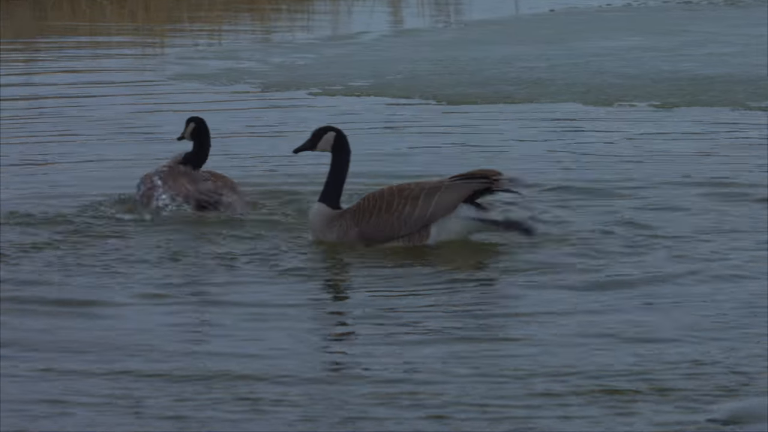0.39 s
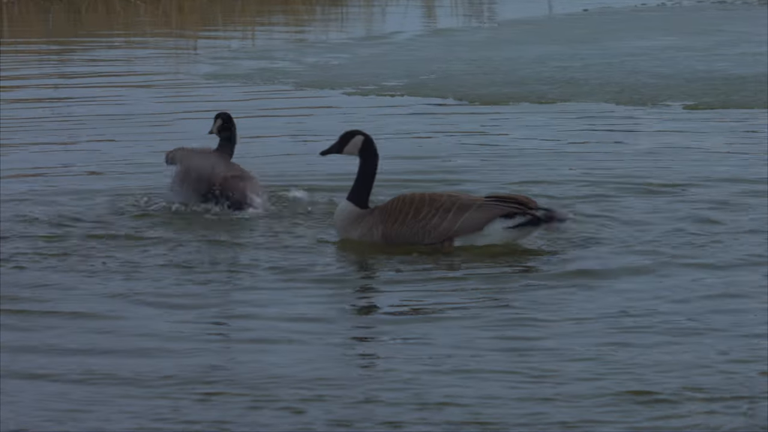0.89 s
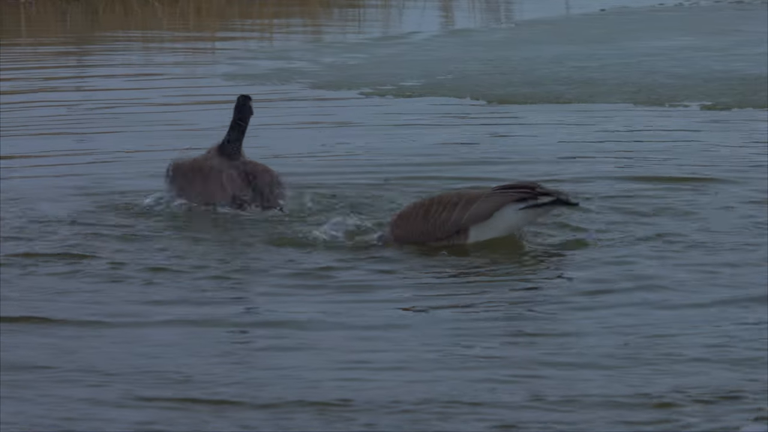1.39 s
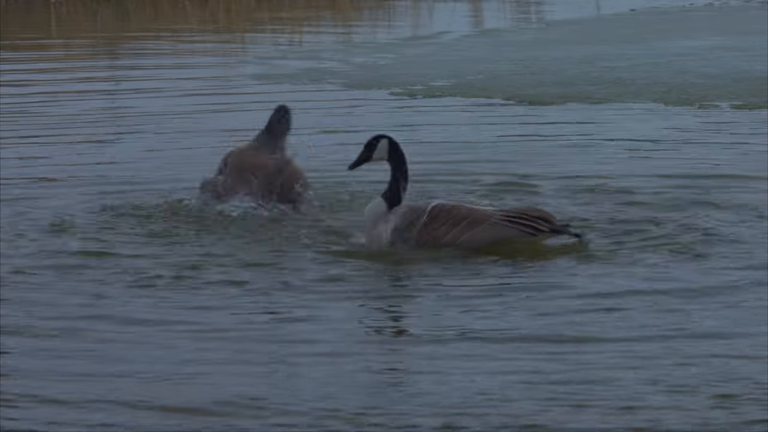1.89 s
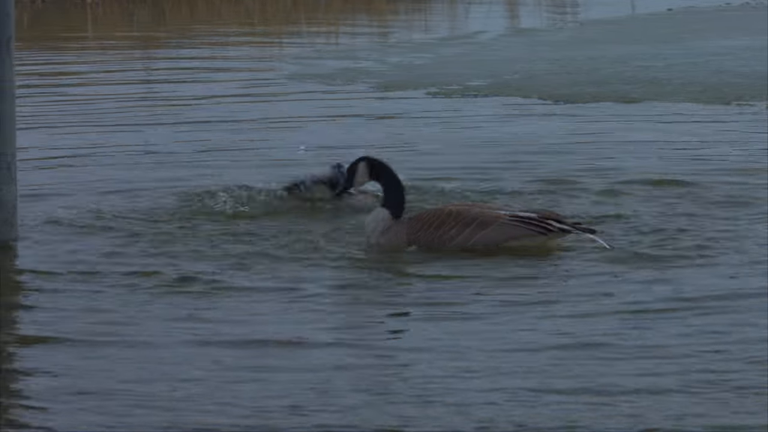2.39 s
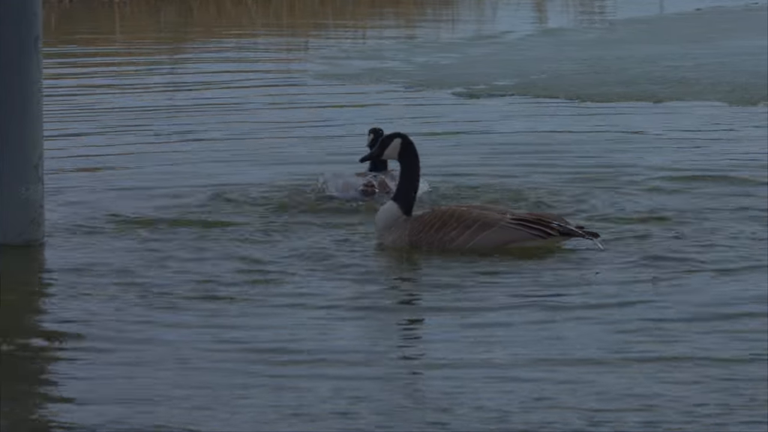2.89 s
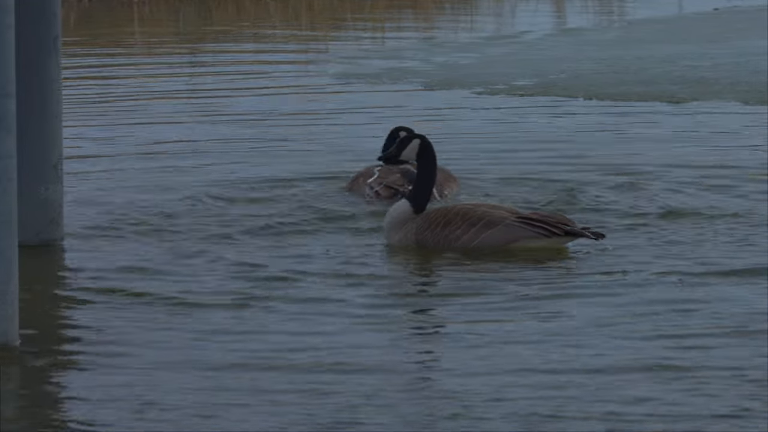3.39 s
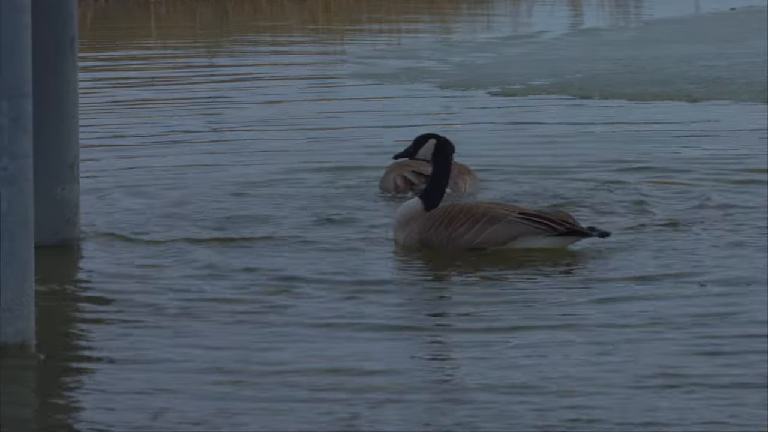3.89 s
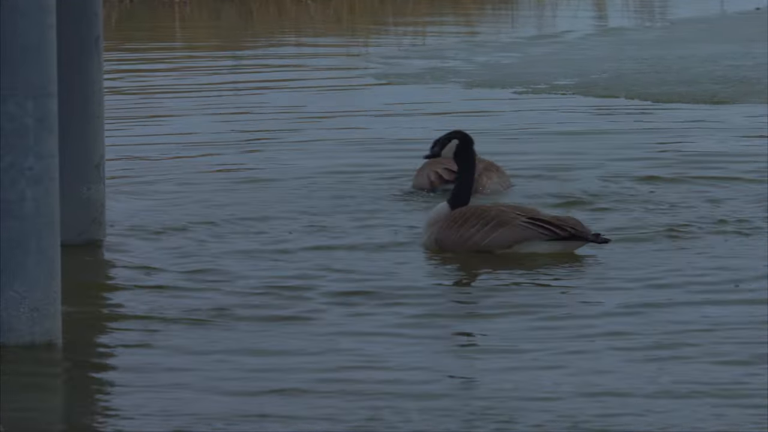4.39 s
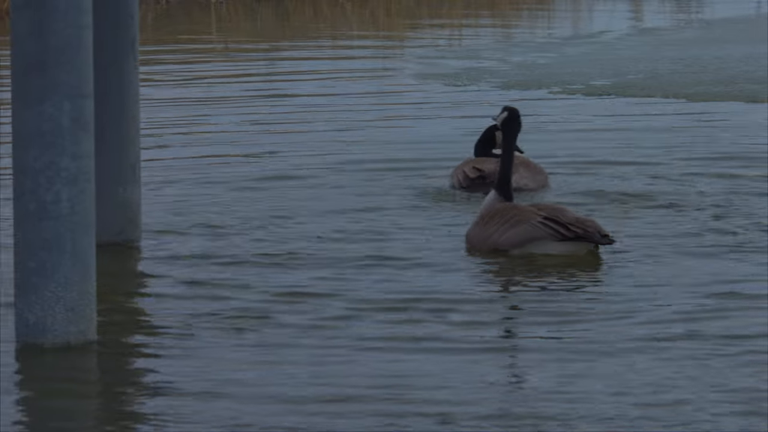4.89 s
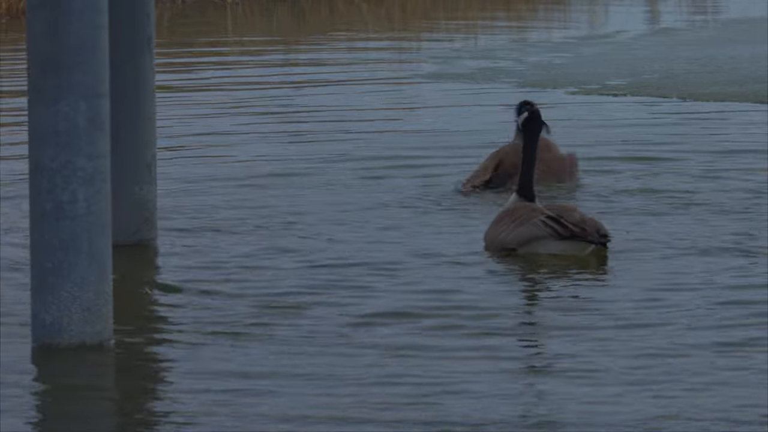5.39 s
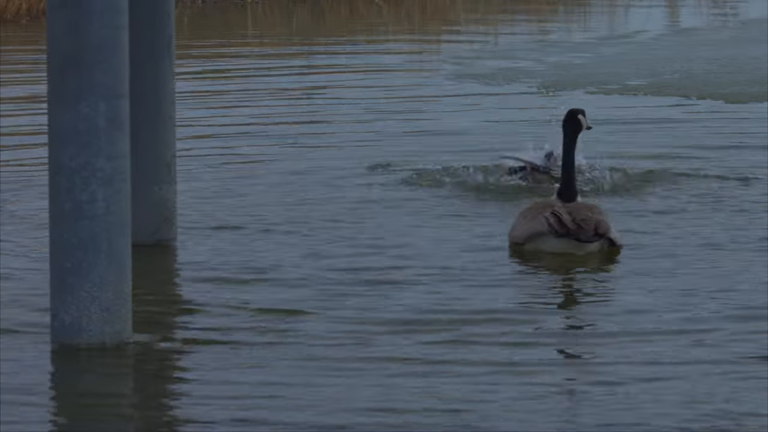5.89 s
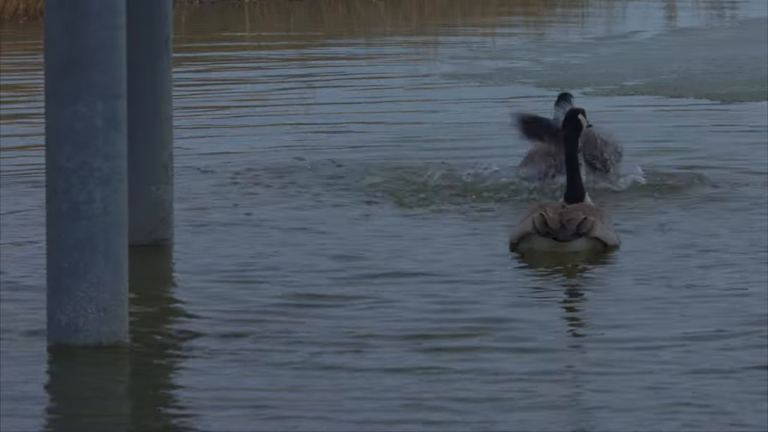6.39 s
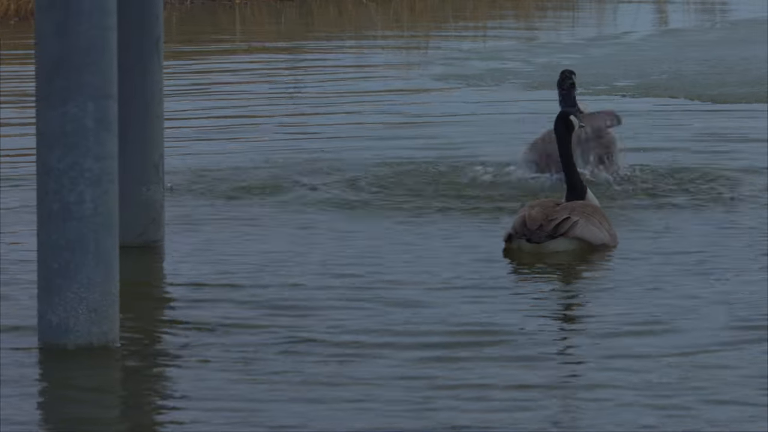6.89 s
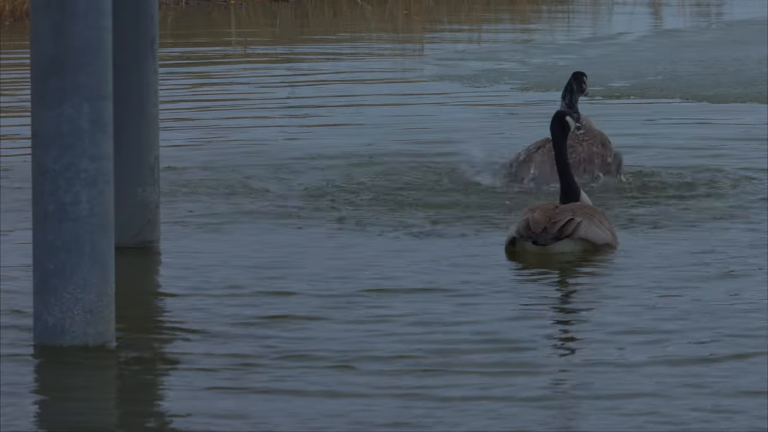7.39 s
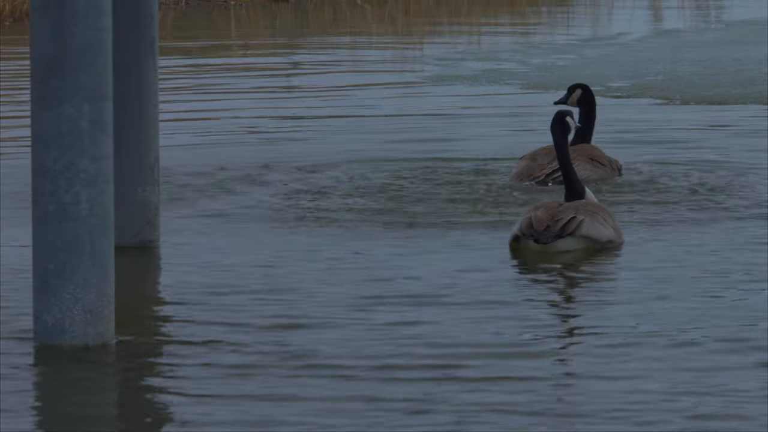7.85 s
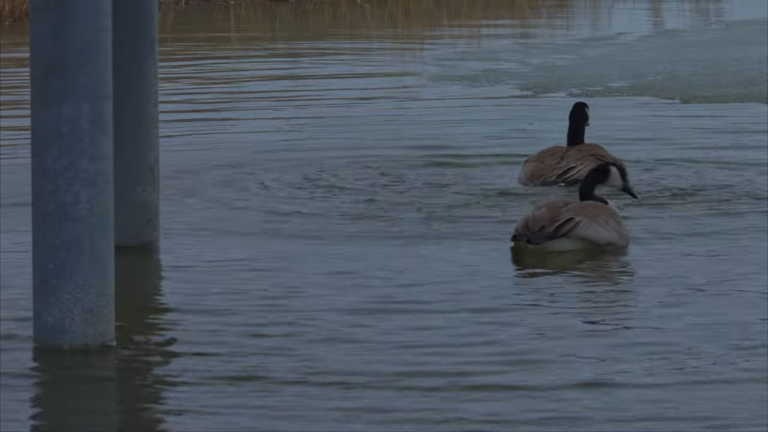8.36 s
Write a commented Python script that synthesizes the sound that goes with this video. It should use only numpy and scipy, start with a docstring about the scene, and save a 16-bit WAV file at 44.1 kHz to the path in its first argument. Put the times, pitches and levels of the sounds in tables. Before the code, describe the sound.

Several geese honk in short overlapping calls on a pond while wings splash the water, over buffeting wind rumble and a far traffic roar.

```python
"""A flock of geese honks across a pond: harmonic stacks on arched pitches, with a rough break at some calls.
Two of them bathe, beating wings on the water: bursts of hiss with bubble grains, and ringing drops.
Wind buffets the microphone as gusty low noise; far traffic is a coloured roar with an engine drone.
A small bird buzzes in the reeds, as two fast-trilled tones; an even hiss lies under it all."""
import sys
import numpy as np
from scipy import signal
from scipy.fft import rfft, irfft, next_fast_len
from scipy.io import wavfile
from scipy.ndimage import uniform_filter1d, map_coordinates

SR = 44100
rng = np.random.default_rng(int(sys.argv[2]) if len(sys.argv) > 2 else 0)


def materialize(psi):
    """Save the field psi as 16-bit PCM at rate SR to the path in sys.argv[1].

    A 1-D psi becomes a single channel; in a 2-D psi each row is a channel.
    """
    bounded = np.clip(np.atleast_2d(psi).T, -1, 1)
    quanta = np.round(bounded * 32767).astype(np.int16)
    wavfile.write(sys.argv[1], SR, quanta)


def attenuation_scalar(level_db):
    """Turn a level in dB into a linear amplitude multiplier (20 dB per decade)."""
    decades = np.asarray(level_db, float) / 20
    return 10 ** decades


N = 374850


def unit(x):
    """x at rms 1."""
    return x / np.sqrt(np.mean(x ** 2) + 1e-20)


def along(points, hz):
    """(f/Hz, value) points read on a log frequency axis."""
    f, v = np.transpose(points)
    return np.interp(np.log(hz + 1), np.log(f + 1), v)


def curves(rows):
    """One value per sample for each column after the time."""
    s, *cols = np.transpose(rows)
    return [np.interp(np.arange(N) / SR, s, c) for c in cols]


def wobble(knots_per_s, count=N):
    """A smooth random curve through normal knots."""
    knots = rng.standard_normal(count // 100 + 4)
    return map_coordinates(knots, [np.arange(count) * knots_per_s / SR])


def coloured(x, spectrum):
    """x through a spectrum, at rms 1."""
    m = next_fast_len(N + SR // 4)
    gain = attenuation_scalar(along(spectrum, np.fft.rfftfreq(m, 1 / SR)))
    return unit(irfft(rfft(x, m) * gain, m)[:N])


def band_rms(x, lo_hz, hi_hz):
    """The rms of x inside a band."""
    hz, power = signal.welch(x, SR, nperseg=1024)
    inside = (hz > lo_hz) & (hz < hi_hz)
    return np.sqrt(power[inside].sum() * hz[1])


def add(track, s, sound):
    """Mixes a sound in at time s."""
    track[max(round(s * SR), 0):][:len(sound)] += sound


def swell(u, rise, fall):
    """An envelope over u = 0..1 with soft ends; rise and fall are fractions of the length."""
    return np.sin(np.pi / 2 * np.clip(np.minimum(u / rise, (1 - u) / fall), 0, 1)) ** 2


def bursts(times_s, levels_db, rise_s, fall_s):
    """An envelope that peaks at each time; rise_s and fall_s are 1/e times before and after it."""
    t = np.arange(-SR // 4, SR // 4) / SR
    shape = np.exp(-np.abs(t) / np.where(t < 0, rise_s, fall_s))
    peaks = np.bincount(np.round(times_s * SR).astype(int), attenuation_scalar(levels_db), minlength=N)
    return np.abs(signal.fftconvolve(peaks, shape, "same"))


def traffic():
    """Far traffic: a roar of coloured noise with a wavering engine note."""
    # roar spectrum: f/Hz, relative density/dB
    roar_spectrum = [(40, -18.5), (70, -9), (120, -5.5), (200, -7), (300, -13.5), (500, -16.5), (700, -18),
                     (1000, -14), (1300, -19.5), (1600, -24), (2200, -41.5), (3500, -57), (6000, -84),
                     (15600, -77)]
    # roar level before a 3 dB lift: t/s, level/dB
    road_level = [(0.0, -66), (0.45, -68.5), (1.75, -66), (2.56, -65), (3.17, -66.5), (4.05, -66.5),
                  (4.4, -65.5), (4.64, -66.5), (5.75, -66.5), (7.36, -68.5), (8.0, -66), (8.5, -69)]
    # engine note: t/s, f/Hz, peak level/dB
    drone = [(0, 108, -67), (1.1, 118, -70.5), (1.9, 122, -62.5), (2.3, 110, -66), (3.5, 110, -70.5),
             (4.5, 108, -66), (5.4, 108, -73.5), (5.9, 108, -59.5), (6.6, 107, -70.5), (7.4, 107, -64),
             (8.5, 105, -70.5)]
    roar_db = curves(road_level)[0] + 3.0 + 0.46 * wobble(3)
    roar = attenuation_scalar(roar_db) * coloured(rng.standard_normal(N), roar_spectrum)
    hz, db = curves(drone)
    note = np.sin(2 * np.pi * np.cumsum(hz + 1.5 * wobble(6)) / SR)
    return roar + attenuation_scalar(db + 1.5 * wobble(5)) * note


def eddies(spectrum, even_s):
    """Low noise of evened strength, so that the gusts set its level."""
    x = coloured(rng.standard_normal(N), spectrum)
    span = round(even_s * SR)
    power = uniform_filter1d(uniform_filter1d(x ** 2, span), span)
    return unit(x / np.sqrt(np.abs(power) + 0.19))


def wind():
    """Large and small eddies push the microphone; both swell in the gusts."""
    # wind between gusts: t/s, large-eddy level/dB
    lull = [(0, -57.5), (.3, -61), (.7, -48), (1.1, -56), (1.7, -55), (2.1, -58.5), (2.6, -55), (3, -44.5),
            (3.3, -49), (3.85, -60), (4.3, -49.5), (5.3, -52.5), (5.7, -56.5), (6.4, -51), (7.4, -59.5),
            (7.7, -63), (8.1, -55.5), (8.5, -47.5)]
    # gusts: t/s, large-eddy peak/dB, small-eddy peak/dB
    gusts = [(0.319, -54, -73), (0.529, -39.5, -48.5), (.66, -48, -60), (.92, -39.5, -64), (1.35, -58, -77),
             (1.479, -46.5, -60), (1.55, -53, -80), (1.77, -44.5, -81), (1.95, -56, -70), (2.32, -49, -73),
             (2.441, -48, -62), (2.588, -41.5, -55.5), (2.779, -39.5, -62), (2.909, -53, -47.5),
             (3.101, -51, -46), (3.309, -43, -55.5), (3.5, -51.5, -63), (3.679, -48.5, -62),
             (3.95, -52, -80), (4.178, -40, -51), (4.28, -58, -56), (4.36, -44, -50), (4.449, -47, -52),
             (4.603, -41, -53), (4.73, -40, -49), (5.04, -65, -57.5), (5.191, -40.5, -51.5),
             (5.36, -42.5, -53.5), (5.56, -50, -58), (5.82, -68, -64), (6, -48, -54.5), (6.141, -49, -65),
             (6.42, -50, -75), (6.58, -60, -64), (6.7, -50, -67), (6.94, -41, -55), (7.14, -59, -64.5),
             (7.292, -40, -51.5), (7.43, -46, -64.5), (7.62, -55, -72), (7.79, -53, -76), (8.049, -50, -57),
             (8.12, -51.5, -76), (8.19, -51, -70), (8.29, -53, -67), (8.379, -41, -50.5),
             (8.471, -48, -45.5)]
    # spectra of large and small eddies: f/Hz, relative density/dB
    large_spectrum = [(8, -30.5), (18, 14.5), (28, 7), (45, 0.5), (70, -12), (110, -33.5), (250, -63.5),
                      (2000, -150)]
    small_spectrum = [(30, -36.5), (60, 5), (90, -1.5), (130, -8.5), (200, -19), (350, -37), (1000, -83),
                      (4000, -150)]
    rise_s, fall_s = .02, 0.032
    small_lasts = 1.8  # small-eddy rise and fall over large-eddy ones
    small_db = -16  # small eddies re large between gusts
    steady = attenuation_scalar(curves(lull)[0])
    s, large_peak_db, small_peak_db = np.transpose(gusts)
    large = steady + bursts(s, large_peak_db, rise_s, fall_s)
    small = attenuation_scalar(small_db) * steady + bursts(s, small_peak_db, small_lasts * rise_s, small_lasts * fall_s)
    return large * eddies(large_spectrum, even_s=.05) + small * eddies(small_spectrum, even_s=0.22)


def small_bird():
    """A fast rough trill: a gliding tone with jittered pitch and level, and a second, higher voice."""
    # buzzes: t/s, length/s, start f/Hz, end f/Hz, lower-voice level before flutter/dB
    buzzes = [(4.016, 0.22, 6360, 6450, -86), (4.997, 0.064, 6500, 6500, -88), (4.66, .05, 6500, 6450, -89),
              (5.24, 0.13, 6500, 6450, -94), (7.118, 0.22, 6600, 6230, -81)]
    out = np.zeros(N + SR)
    for s, length_s, start_hz, end_hz, db in buzzes:
        count = round(length_s * SR)
        u = np.arange(count) / count
        glide_hz = start_hz + (end_hz - start_hz) * u ** 2
        for ratio, voice_db in [(1, 0), (1.22, -4)]:
            hz = ratio * glide_hz * (1 + 0.041 * wobble(400, count=count))
            tone = np.sin(2 * np.pi * np.cumsum(hz) / SR)
            level = attenuation_scalar(db + voice_db + 3.1 * wobble(60, count=count))
            add(out, s, level * swell(u, rise=0.13, fall=0.41) * tone)
    return out[:N]


def bubbles(hz, life_s, t):
    """Damped rings, one a row, whose pitch rises as the bubble nears the surface."""
    life = t / life_s
    ring = np.sin(2 * np.pi * hz[:, None] * t * (1 + 0.0085 * life))
    return ring * np.exp(-life) * (1 - np.exp(-6 * life))


def drops():
    """Single drops and slaps: a noise crack on the surface and a brief bubble ring."""
    # drops: t/s, bubble peak/dB, bubble f/Hz, initial crack rms/dB
    drop_rows = [(0.0706, -63, 2330, -79), (0.2228, -60, 2410, -78), (0.5962, -63, 5340, -79),
                 (0.6758, -59, 5430, -66), (0.8536, -64, 5170, -73), (1.0085, -60, 4390, -71),
                 (1.096, -63, 6200, -68), (1.2096, -62, 5340, -72), (1.2688, -70, 6030, -70),
                 (1.2838, -62, 3620, -80), (1.3561, -67, 4130, -71), (1.3697, -61, 2150, -72),
                 (1.5391, -62, 2670, -77), (1.6216, -60, 5340, -71), (1.8225, -57, 3360, -71),
                 (1.9171, -57, 5430, -60), (1.9325, -59, 3360, -66), (2.0565, -66, 4310, -74),
                 (2.1411, -58, 3270, -81), (2.3894, -63, 2500, -80), (2.6788, -68, 5500, -86),
                 (3.4805, -74, 6800, -86), (3.6353, -75, 5000, -86), (4.6955, -69, 3270, -79),
                 (5.5098, -66, 6980, -65), (5.7969, -65, 3450, -82), (5.8896, -63, 2330, -65),
                 (5.932, -70, 6000, -86), (6.0255, -62, 3530, -64), (6.1858, -64, 3270, -76),
                 (6.2305, -56, 2150, -77), (6.3996, -63, 2840, -83), (6.4502, -62, 2500, -75),
                 (6.642, -57, 3530, -71), (6.6985, -63, 6550, -73), (6.8012, -50, 2500, -75),
                 (6.8144, -47, 2670, -66), (7.0207, -54, 5430, -58), (7.0323, -59, 3450, -64),
                 (7.2178, -62, 5250, -68), (7.4321, -66, 5250, -77), (7.6847, -67, 2500, -81)]
    out, t = np.zeros(N + SR), np.arange(SR // 50) / SR
    for s, db, hz, crack_db in drop_rows:
        ring = bubbles(np.array([hz]), .0006, t)[0]
        crack = rng.standard_normal(len(t)) * attenuation_scalar(-60 * t / .003)  # -60 dB in 3 ms
        add(out, s - .0005, attenuation_scalar(db) * ring / ring.max() + attenuation_scalar(crack_db) * crack)
    return out[:N]


def splashing():
    """Wing beats throw spray: hiss with dense bubble grains, and a finer crackle on top."""
    # spectra of spray and fine spray: f/Hz, relative density/dB
    spray_spectrum = [(500, -5), (1200, 10), (2200, 0), (3500, -4), (5600, -7.5), (8000, -22.5),
                      (16000, -32)]
    mist_spectrum = [(2000, -57), (4000, -9), (6500, 3.5), (9000, -5), (12000, -6.5), (15500, -6)]
    # wash between beats, how hard the birds bathe: t/s, 4.8-6.4 kHz level before a 1.5 dB cut/dB
    bathing = [(0, -87), (.4, -94), (.9, -89.5), (1.3, -91), (1.5, -85), (1.95, -86.5), (2.3, -91.5),
               (2.5, -88.5), (3, -97), (4, -95.5), (5.5, -96), (5.9, -89), (6.2, -86), (6.8, -88.5),
               (7.2, -90.5), (7.6, -94), (8.2, -93), (8.5, -97.5)]
    # wing beats: t/s, spray peak in 4.8-6.4 kHz/dB, fine spray peak in 8.5-15 kHz/dB
    beats = [(.09, -92, -93), (.23, -93, -92), (.285, -98, -101), (.61, -93, -97), (.68, -93, -90),
             (.77, -114, -105), (.85, -93, -92), (1.008, -87, -90), (1.10, -101, -97), (1.198, -88, -92),
             (1.373, -88.5, -86), (1.5, -91, -100), (1.58, -95, -84.5), (1.625, -110, -113),
             (1.741, -88, -83), (1.861, -86, -93), (1.93, -81, -81), (2.07, -108, -107), (2.19, -87, -87),
             (2.32, -85, -105), (2.42, -87, -94), (2.73, -93, -100), (3.18, -109, -99), (4.21, -98, -91),
             (4.69, -102, -89.5), (5.51, -96, -101), (5.6, -88, -99), (5.886, -90, -89), (5.98, -102, -107),
             (6.025, -98, -93), (6.19, -88, -109), (6.27, -98, -105), (6.38, -96, -105), (6.469, -87, -88),
             (6.63, -89, -90), (6.71, -98, -99), (6.818, -73.5, -88), (7.022, -82.5, -83), (7.22, -87, -83),
             (7.285, -107, -92), (7.44, -95, -98), (7.7, -102, -91)]
    rise_s, fall_s = 0.0069, 0.016
    wash_mist_db = -5.5  # fine spray re spray in the wash

    draws = rng.random((2500, 3))
    at = (draws[:, 0] * N).astype(int)[:, None] + np.arange(300)
    hz = 1800 * 5.42 ** draws[:, 1]
    size = attenuation_scalar(8.2 * draws[:, 2] ** 4)
    grains = bubbles(hz, 0.00099, np.arange(at.shape[1]) / SR) * size[:, None]
    fizz = unit(np.bincount(at.ravel(), grains.ravel(), minlength=N)[:N])
    spray = coloured(rng.standard_normal(N) + 0.41 * fizz, spray_spectrum)
    spray = spray / band_rms(spray, 4800, 6400)

    ticks = (rng.random(N) < 250 / SR) * attenuation_scalar(4.4 * rng.standard_normal(N))  # about 250 a second
    flutter = rng.standard_normal(N) * attenuation_scalar(4.2 * wobble(430))
    mist = coloured(flutter + .45 * unit(ticks), mist_spectrum)
    mist = mist / band_rms(mist, 8500, 15000)

    s, spray_db, mist_db = np.transpose(beats)
    wash = attenuation_scalar(curves(bathing)[0] - 1.5 + 1.4 * wobble(25))
    thrown = bursts(s, spray_db, rise_s, fall_s)
    fine = bursts(s, mist_db, rise_s, fall_s)
    return (wash + thrown) * spray + (attenuation_scalar(wash_mist_db) * wash + fine) * mist


def breaks():
    """Uneven pulses through the bill while the voice jumps from low grunt to high honk."""
    # rough breaks: t/s, length/s, gate peak/dB
    break_rows = [(1.482, 0.028, -73), (1.83, .025, -76), (2.698, 0.029, -72), (3.147, 0.037, -71.5),
                  (4.195, .025, -85), (5.19, 0.03, -82), (5.557, 0.041, -74.5)]
    # bill colour: f/Hz, gain/dB
    bill = [(1500, -17), (2600, 10), (3300, -18), (3900, 12), (4500, 9), (5000, -57), (7000, -36)]
    cycle = np.cumsum(500 * (1 + 0.04 * wobble(200))) / SR  # about 500 pulses a second
    pulses = np.diff(np.floor(cycle), prepend=0) * attenuation_scalar(2.5 * rng.standard_normal(N))
    gate = np.zeros(N + SR)
    for s, length_s, db in break_rows:
        u = np.linspace(0, 1, round(length_s * SR))
        add(gate, s, attenuation_scalar(db) * swell(u, rise=0.23, fall=0.22))
    return gate[:N] * coloured(pulses, bill)


def geese():
    """Each call is a harmonic stack on an arched pitch; one bill resonance lifts the upper partials."""
    # calls by kind: t/s, length/s, middle f/Hz, base level/dB, bill resonance re base level/dB
    # voices: start/middle pitch ratio, scoop (start ratio lost per length)/(1/s), end/middle pitch ratio,
    # partials 1, 2, 3 re base level/dB (3 before its pitch trim), bill resonance f/Hz
    kinds = [
        ([(0.575, 0.096, 445, -68, -26), (1.02, 0.041, 406, -64.5, -35), (1.781, 0.084, 460, -66, -7),
          (2.222, .081, 442, -67.5, -30), (2.652, 0.066, 447, -67, -9), (3.098, 0.068, 445, -66, -13),
          (3.622, 0.072, 454, -67, -20), (4.122, .094, 456, -65.5, -19), (5.129, .11, 476, -66.5, -18),
          (5.367, 0.051, 518, -72, -36), (5.548, .038, 477, -61.5, -27)], (1.0, .9, 1.11, 0, -9, -26, 1700)),  # low rising, open the two-part call
        ([(1.477, 0.049, 696, -63.5, -22), (1.829, .057, 688, -62.5, -20), (2.286, 0.066, 650, -67, -22),
          (2.691, 0.067, 666, -64, -12.5), (3.15, 0.054, 661, -64.5, -18), (3.675, 0.061, 664, -66.5, -28),
          (4.185, 0.055, 685, -61.5, -26), (5.556, 0.082, 687, -68, -15)], (1.05, 0, .96, -1.5, 0, -7, 4050)),  # high falling, mostly its second part
        ([(2.82, 0.053, 553, -73, -11), (3.283, 0.063, 582, -65.5, -18), (4.332, 0.043, 570, -61, -17),
          (1.451, 0.061, 491, -62.5, -33), (7.522, 0.064, 606, -59, -24), (7.914, .06, 603, -59, -38)], (.95, 0, .93, -4, 0, -11, 2350)),  # fuller, arched, a lower-voiced bird
        ([(1.099, 0.047, 647, -63.5, -36), (1.569, 0.034, 838, -52, -32), (1.592, .046, 776, -76, -24),
          (6.098, 0.0725, 596, -60.5, -31), (5.773, 0.08, 571, -69, -29), (5.775, 0.077, 409, -67.5, -31),
          (7.422, 0.059, 560, -74, -30), (7.762, 0.073, 624, -62, -29), (8.167, 0.0803, 620, -60.5, -29),
          (8.381, 0.06, 639, -68.5, -25)], (1.1, 1.5, .88, 0, -3, -21, 3450)),  # rounder, falling, another bird
        ([(1.202, 0.071, 626, -68, -30), (1.257, 0.049, 570, -58, -30), (1.264, 0.055, 648, -64, -27),
          (4.242, 0.05, 559, -65, -34), (4.293, 0.061, 645, -57, -35), (4.384, 0.054, 636, -66, -40),
          (4.388, 0.073, 495, -74, -33), (4.457, .14, 659.5, -60, -35), (4.642, 0.075, 541, -62, -35),
          (4.817, .11, 664, -61, -38), (5.084, 0.053, 637, -59, -35), (5.09, 0.065, 740, -70, -32),
          (5.237, 0.11, 670, -59.5, -32), (5.487, 0.055, 641, -60.5, -34), (5.5, .056, 740, -64, -36),
          (5.635, 0.03, 790, -61, -39), (5.7, .11, 675, -56, -37), (5.795, 0.024, 622, -47, -45),
          (6.15, 0.052, 686, -68, -26), (6.152, 0.077, 551, -63.5, -31), (6.52, 0.058, 654, -67, -28),
          (6.739, .12, 683, -59.5, -41), (6.912, .056, 752, -71, -26), (7.986, .041, 633, -60.5, -35),
          (8.005, 0.13, 512, -59.5, -47)], (1.06, 1.45, .965, -22, 0, -23, 3800)),  # nasal, carried by the second partial
    ]
    # the 3rd partial fades as pitch carries it off the throat's resonance
    third_ref_hz, third_db_per_hz = 600, -.08
    out = np.zeros(N + SR)
    calls = [(call, voice) for rows, voice in kinds for call in rows]
    for (s, length_s, middle_hz, level_db, brass_db), voice in calls:
        start, scoop, end, *partial_db, bill_hz = voice
        count = round(length_s * SR)
        u = np.arange(count) / count
        # parabola through start, middle and end
        arch = (start - scoop * length_s) * (2 * u - 1) * (u - 1) + 4 * u * (1 - u) + end * u * (2 * u - 1)
        phase = 2 * np.pi * np.cumsum(middle_hz * arch * (1 + .006 * wobble(150, count=count))) / SR
        octaves_off = np.log2(np.arange(4, 12) * middle_hz / bill_hz)
        bill_loss_db = np.where(octaves_off > 0, 28 * octaves_off, -8 * octaves_off)
        levels_db = level_db + np.r_[partial_db, brass_db - bill_loss_db]
        levels_db[2] += third_db_per_hz * (middle_hz - third_ref_hz)
        effort = swell(u, rise=0.03 / length_s, fall=0.026 / length_s)
        hoarse = attenuation_scalar(2.2 * wobble(300, count=count))
        turn = 2 * np.pi * rng.random(len(levels_db))
        for k, db in enumerate(levels_db):
            # higher partials waver more and come later in the call
            drift_db = 1.1 * k * (u - .1) + (.7 + 0.3 * k) * wobble(60, count=count)
            shape = hoarse * effort ** (1 + 0.3 * k) * attenuation_scalar(db + drift_db)
            add(out, s, np.sqrt(2) * shape * np.sin((k + 1) * phase + turn[k]))
    return out[:N]


def shore(x):
    """The banks send back a short dull tail: smoothed noise losing 60 dB in 0.21 s."""
    t = np.arange(SR // 2) / SR
    tail = uniform_filter1d(rng.standard_normal(len(t)), size=4) * attenuation_scalar(-60 * t / 0.21)
    return signal.fftconvolve(x, tail / np.linalg.norm(tail))[:N]


def scene():
    """All sources at one microphone; the shore returns voices and drops."""
    pond = geese() + breaks() + drops() + small_bird()
    return (pond + attenuation_scalar(-16.0) * shore(pond) + splashing() + traffic() + wind())[None]


def band_limit(x):
    """A steep low-pass at the top of the band."""
    return signal.sosfilt(signal.butter(12, 15700, fs=SR, output="sos"), x)


def record(dry):
    """Adds the microphone's own even hiss."""
    # hiss spectrum: f/Hz, relative density/dB
    hiss_spectrum = [(1500, -14.5), (3500, -7), (8000, -0.5), (14000, -3), (15700, -12.5)]
    hiss_db = -93
    mix = dry + attenuation_scalar(hiss_db) * coloured(rng.standard_normal(N), hiss_spectrum)
    return band_limit(mix)


dry = scene()
out = record(dry)
materialize(out)
```